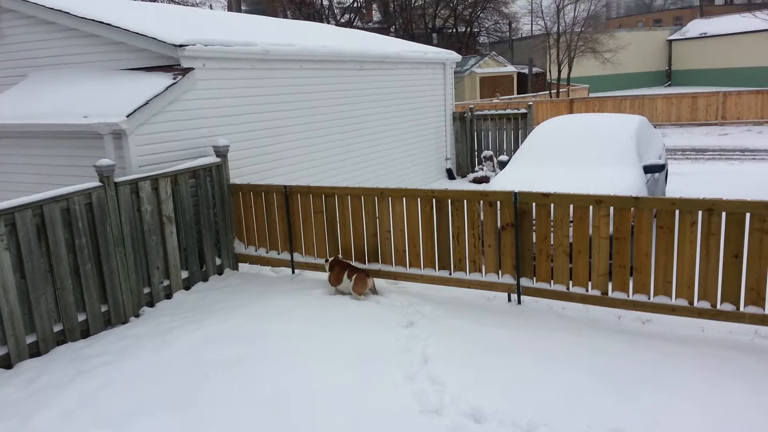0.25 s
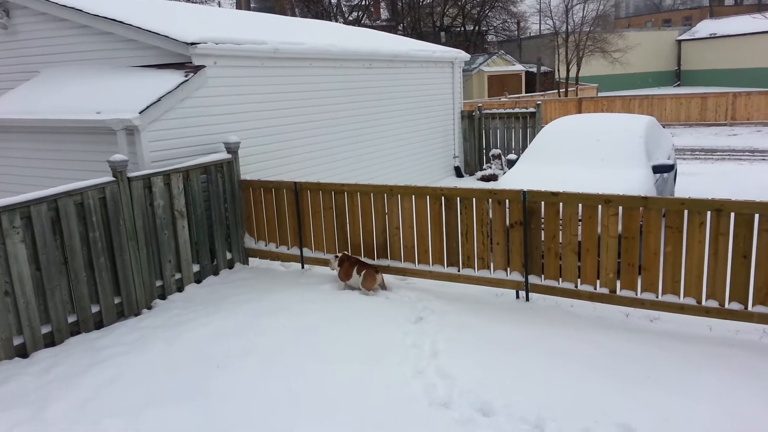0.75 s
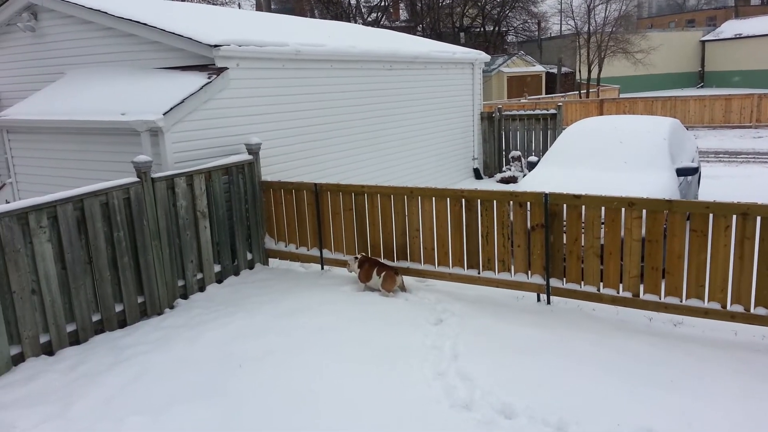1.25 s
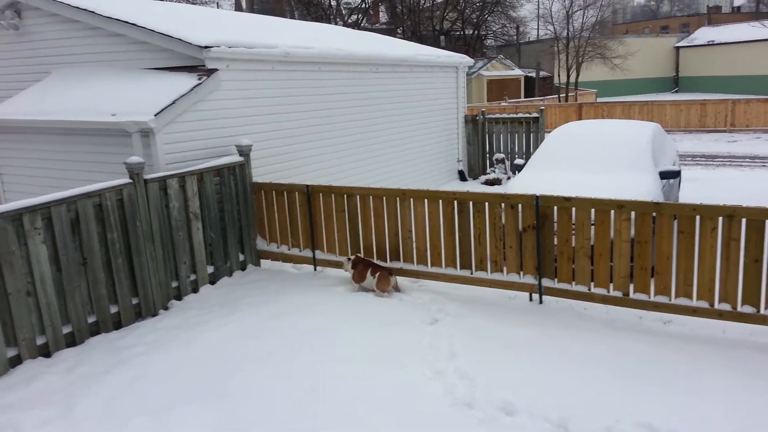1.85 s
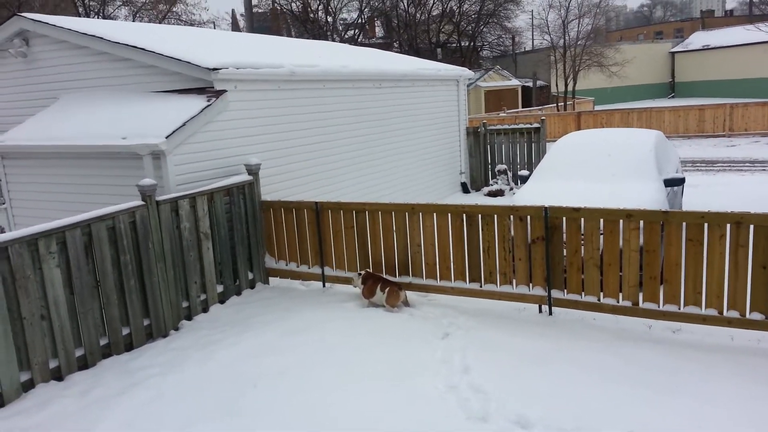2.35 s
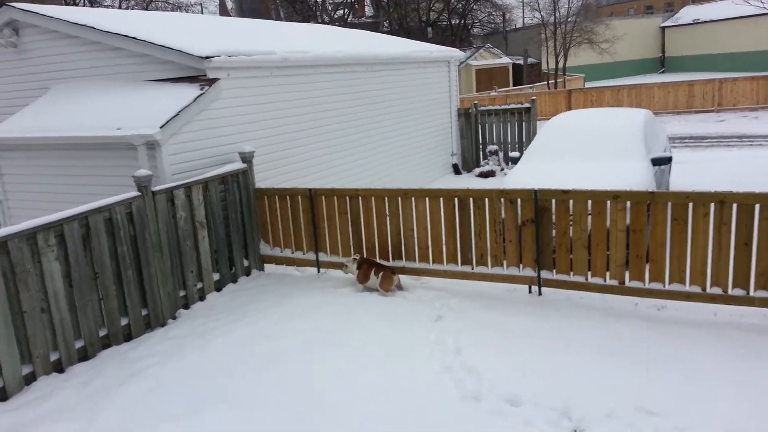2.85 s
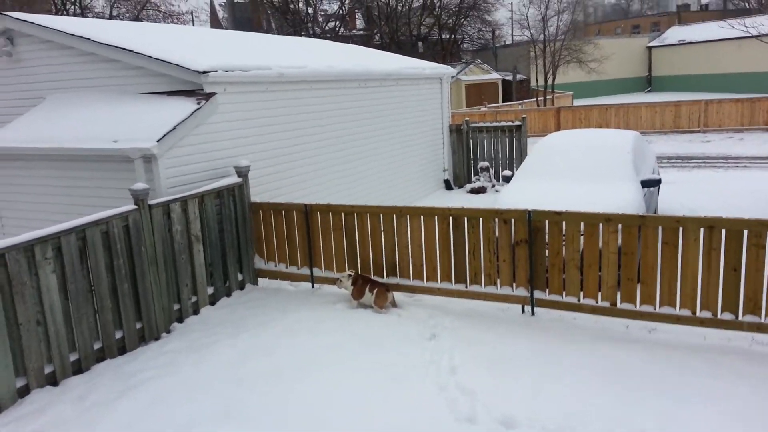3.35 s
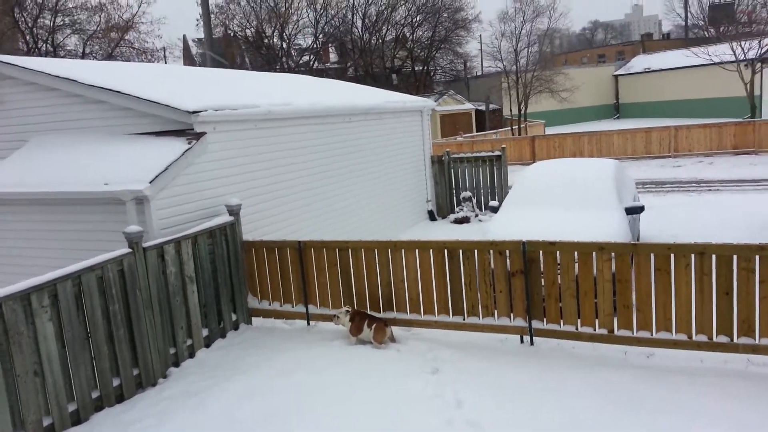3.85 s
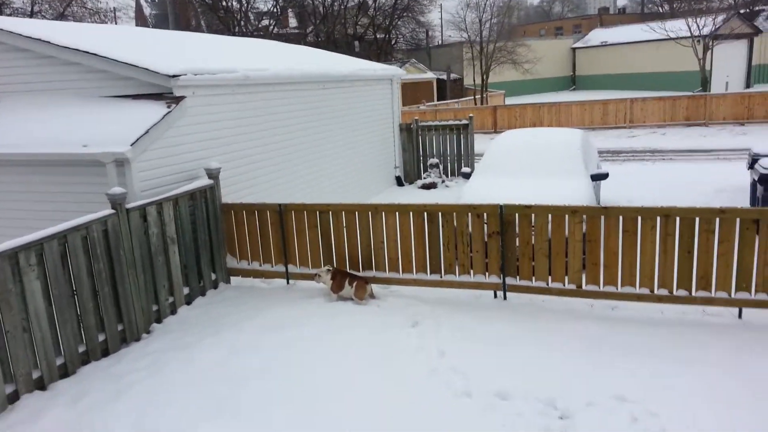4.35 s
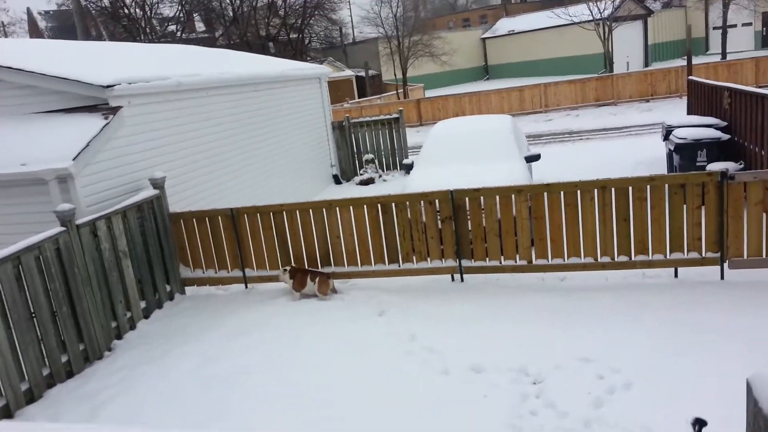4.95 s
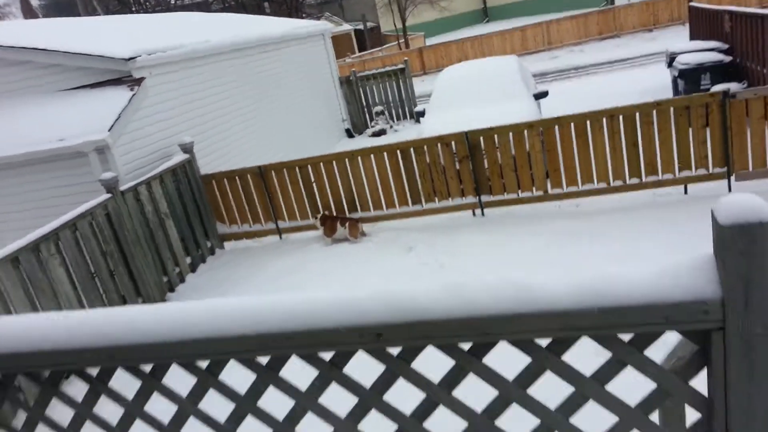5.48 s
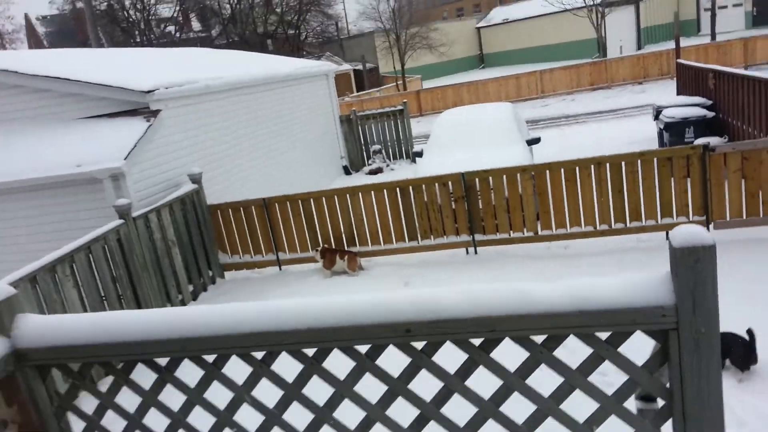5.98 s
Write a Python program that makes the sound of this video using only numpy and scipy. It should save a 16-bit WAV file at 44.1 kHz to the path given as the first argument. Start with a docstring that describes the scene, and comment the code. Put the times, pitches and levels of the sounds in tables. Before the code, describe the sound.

Someone steps slowly across a snow-covered wooden deck just below a hand-held phone. A soft knock and light crunch come first, then frozen boards creak in sharp dry slips near two and three seconds. After four seconds the crust crunches and snaps densely, and the last steps knock dully on the planks. Far traffic hums quietly in an open winter yard.

```python
"""Slow steps across a snow-covered wooden deck, right below a hand-held phone, in a quiet winter yard.
Soles knock the planks dully and pack the snow in random grains that cave in by bursts; crust snaps.
Frozen boards creak in single sharp slips with decaying modes; the joists thud in narrow bands of noise.
Rasps, powder, squeaks and one cloth swish are faint. Behind it filtered noise makes the hum of far traffic."""
import sys
import numpy as np
from scipy import signal
from scipy.fft import rfft, irfft
from scipy.io import wavfile
from scipy.ndimage import uniform_filter1d

SR = 44100
rng = np.random.default_rng(int(sys.argv[2]) if len(sys.argv) > 2 else 0)


def transcribe(u):
    """Save the signal u as a 16-bit wav file named by the first command-line argument.

    u: samples, shape (n,) or (channels, n), limited to [-1, 1]; the rate is SR.
    q: integer samples, one column per channel.
    """
    v = np.clip(np.atleast_2d(u).T, -1, 1)
    q = np.round(v * 32767).astype(np.int16)
    wavfile.write(sys.argv[1], SR, q)


N = 274302
TIME = np.arange(N) / SR

# board resonances: mode_hz, level_db, t60_s
BOARD = [(204, -27, 0.16), (309.2, -6, 0.24), (381.4, -4, 0.24), (483, 9.5, 0.028), (619, -5, 0.12),
         (764, -7, 0.07), (893, 4, 0.04), (1083, -5, 0.061), (1508, 2, 0.053), (1690, -4, 0.085),
         (1817, -6, 0.07), (2107, 0, 0.038), (2284, -5, 0.041), (2520, -17, 0.042), (2980, -0.5, 0.024),
         (3250, -12, 0.065), (3550, -5, 0.015), (3840, -4.5, 0.022)]
# packed snow spectrum: freq_hz, level_db
CRUNCH = [(100, -21), (250, -30), (500, 4.5), (850, 5), (1150, 4), (1500, 3), (2300, -4), (3400, -5.5),
          (4600, -12.5), (7000, -17), (14000, -32)]
# loose powder spectrum: freq_hz, level_db
POWDER = [(1000, -7), (3000, 15.5), (5000, 12.5), (7000, 6), (12000, 8), (15000, -9)]
# snow-softened footfall spectrum: freq_hz, level_db
FOOTFALL = [(30, -45), (60, -33), (100, -17.5), (160, -7), (270, 1.5), (360, -0.5), (500, 2), (680, -14),
            (1400, -20.5), (4000, -67)]


def undb(db):
    """Decibels to gain."""
    return 10 ** (np.asarray(db) / 20)


def unit(x):
    """Scale to rms 1."""
    return x / np.sqrt(np.mean(x ** 2))


def along(points, n):
    """Interpolate a table over log frequency at the bins of an n-point transform."""
    hz, value = np.transpose(points)
    bin_hz = np.arange(n // 2 + 1) * SR / n
    return np.interp(np.log(bin_hz + 1), np.log(hz), value)


def colour(x, points):
    """Filter a sound by a spectrum, zero phase."""
    n = x.shape[-1]
    return irfft(rfft(x) * undb(along(points, n)), n)


def peaked(points, hz, peak_db=7, octaves=0.33):
    """Add one resonance of the given height and width to a spectrum."""
    grid_hz = np.geomspace(60, 15000, 128)
    at_hz, db = np.transpose(points)
    base_db = np.interp(np.log(grid_hz), np.log(at_hz), db)
    bump_db = peak_db * np.exp(-(np.log2(grid_hz / hz) / octaves) ** 2)
    return np.c_[grid_hz, base_db + bump_db]


def click(points, size=1024):
    """Minimum-phase impulse with this spectrum and unit energy."""
    cepstrum = irfft(along(points, size) * np.log(10) / 20)
    # fold onto positive time: causal
    cepstrum[1:size // 2] *= 2
    cepstrum[size // 2 + 1:] = 0
    impulse = irfft(np.exp(rfft(cepstrum)))
    return impulse / np.linalg.norm(impulse)


def band(x, lo_hz, hi_hz, order=2):
    """Butterworth band-pass."""
    edges_hz = [lo_hz, min(hi_hz, SR / 2 - 500)]
    return signal.sosfilt(signal.butter(order, edges_hz, "band", fs=SR, output="sos"), x)


def spread(pair):
    """Mix two unrelated sounds into left and right: alike in the bass, apart in the treble."""
    # channel likeness: freq_hz, likeness_0_to_1
    likeness = [(100, 0.96), (250, 0.92), (500, 0.71), (1000, 0), (3000, 0), (8000, 0)]
    alike = np.clip(along(likeness, pair.shape[1]), 0, 1)
    mid, side = rfft(pair) * np.sqrt([1 + alike, 1 - alike])
    return irfft(np.array([mid + side, mid - side]), pair.shape[1]) / np.sqrt(2)


def pan(left_minus_right_db):
    """Left and right gains."""
    return undb(np.array([[left_minus_right_db], [-left_minus_right_db]]) / 2)


def walk(rate_hz):
    """Random levels held for 1 / rate_hz and smoothed twice; spread near 1."""
    hold = int(SR / rate_hz)
    steps = np.repeat(rng.standard_normal(N // hold + 1), hold)
    return 1.3 * uniform_filter1d(uniform_filter1d(steps, hold), hold)[:N]


def fade(t_s, t60_s):
    """Exponential decay."""
    return np.exp(-np.log(1000) * t_s / t60_s)


def swell(s, length_s):
    """Gaussian rise and fall around time s."""
    return np.exp(-2 * np.minimum(np.abs(TIME - s) / length_s, 10) ** 2)


def burst(points, t60_s, size=8192, rise_s=0.0027):
    """Decaying coloured noise in two channels, unit energy per channel on average."""
    noise = colour(spread(rng.standard_normal((2, size))), points)
    t = TIME[:size]
    return unit(noise * fade(t, t60_s) * (1 - fade(t, rise_s))) / np.sqrt(size)


def grains(points, rate_hz, scatter_db):
    """Ice bonds break at random; positive scatter makes a few large grains, negative a few small."""
    size = undb(scatter_db * np.minimum(rng.exponential(size=(2, N)), 4)) * rng.choice([-1, 1], (2, N))
    breaks = size * (rng.random((2, N)) < rate_hz / SR)
    return unit(signal.fftconvolve(spread(breaks), click(points)[None], axes=1)[:, :N])


def add(out, s, sound):
    """Mix a sound in at time s."""
    i = max(int(s * SR), 0)
    out[:, i:i + sound.shape[1]] += sound[:, :max(N - i, 0)]


def town(level_db=-44.5, drone_hz=224, drone_db=-11, waver_db=1.5):
    """Far traffic: a low roar and a drone that waver together, under a steady smooth hiss."""
    # traffic noise spectrum: freq_hz, level_db
    spectrum = [(25, -48), (50, -17), (140, -2.5), (250, -0.5), (350, -7.5), (450, -9), (880, -17.5),
                (1500, -24.5), (4000, -30), (6800, -36), (10000, -35.5), (13800, -34.5), (15000, -43)]
    # slow level of roar and drone: time_s, level_db
    traffic = [(0, 1), (.6, 1.5), (1.3, 0), (3.5, -1), (4.1, 3.5), (4.6, 5.5), (5.0, 1.5), (6.2, -0.5)]
    noise = unit(colour(spread(rng.standard_normal((2, N))), spectrum))
    roar = colour(noise, [(60, 0), (120, -2.0), (280, 2.5), (600, -13.0), (1500, -14)])
    hiss = noise - roar
    drone = unit(band(rng.standard_normal(N), drone_hz - 9, drone_hz + 9))
    flow = undb(np.interp(TIME, *np.transpose(traffic)) + waver_db * walk(5.45))
    return undb(level_db) * (hiss + flow * (roar + undb(drone_db) * drone))


def swish(middle_s=5.082, length_s=0.075, level_db=-56, middle_hz=5280, glide_hz_per_s=4500, width_hz=330):
    """Cloth slides over cloth: a thin band of hiss, low noise on a rising carrier."""
    hz = middle_hz + glide_hz_per_s * np.clip(TIME - middle_s, -2 * length_s, 2 * length_s)
    carrier = np.sin(2 * np.pi * np.cumsum(hz) / SR)
    hiss = band(rng.standard_normal((2, N)), 15, width_hz) * carrier
    return undb(level_db) * swell(middle_s, length_s) * unit(hiss)


def sags(width_ratio=1.19):
    """Joists take the weight: soft, deep thuds of narrow-band noise."""
    # sagging deck: middle_s, length_s, level_db, pitch_hz
    sag_rows = [(0.124, 0.08, -45.5, 173), (1.78, 0.19, -45, 168), (2.087, 0.035, -46, 211),
                (2.95, 0.13, -44.5, 125), (2.976, 0.053, -42.5, 310), (4.06, 0.11, -42, 166),
                (4.707, 0.059, -43, 61.5), (5.45, 0.15, -52, 68)]
    out = 0
    for s, length_s, db, hz in sag_rows:
        thud = unit(band(rng.standard_normal(N), hz / width_ratio, hz * width_ratio))
        out = out + undb(db) * swell(s, length_s) * thud
    return out


def squeaks(waver_hz=110):
    """Crystals stick and slip fast enough for a brief, unsteady pitch."""
    # squeaking crystals: middle_s, length_s, pitch_hz, level_db
    squeak_rows = [(2.86, .02, 3260, -47), (3.216, .006, 3650, -55), (3.31, .005, 3430, -51)]
    waver = 2 * np.pi * waver_hz * np.cumsum(walk(400)) / SR
    return sum(undb(db) * swell(s, length_s) * np.sin(2 * np.pi * hz * TIME + waver)
               for s, length_s, hz, db in squeak_rows)


def scuffs():
    """A light drag rubs ice crystals in a fine rasp and sweeps loose powder along."""
    # sole skims the crust: middle_s, length_s, rasp_db, powder_db
    scuff_rows = [(1.573, 0.039, -44, -50.5), (2.755, 0.047, -68, -54), (2.844, 0.057, -45.5, -57),
                  (3.954, 0.03, -51.5, -51), (4.01, 0.16, -51, -74), (4.682, 0.037, -45, -49)]
    # rasp spectrum: freq_hz, level_db
    rasp_colour = [(500, -1), (1500, -1), (2700, -5), (3300, 1), (3900, -2), (5200, -12), (6500, -17),
                   (14000, -21)]
    rasp = grains(rasp_colour, rate_hz=11000, scatter_db=-5.0)
    powder = grains(POWDER, rate_hz=6500, scatter_db=-4.0)
    return sum(swell(s, length_s) * (undb(rasp_db) * rasp + undb(powder_db) * powder)
               for s, length_s, rasp_db, powder_db in scuff_rows)


def slip_tilt(hz, bright_db, tick_db):
    """Treble lift in dB of a drier slip: none below 2150 Hz, its own level above 5100 Hz."""
    middle_db = bright_db + np.interp(hz, [750, 5400], [7.5, 4.5])
    return np.where(hz < 2150, 0, np.where(hz > 5100, tick_db, middle_db))


def cracks(slip_db=-3.5, push_db=1, thump_db=2.5, gain_db=23, flex_hz=2200, push_hz=650,
           detune=0.012, mode_scatter_db=3, tick_db=-2.0, tick_share=0.26):
    """A frozen board slips: sharp push and rebound, tearing fibres, brief ring and a boom of the deck."""
    # board slips: start_s, level_db, brightness_db, left_minus_right_db (before an offset),
    # splinter_hz, splinter_db, ring_db, boom_db, boom_hz
    crack_rows = [(0.1642, -46, -2, 0, 3900, 2, -3, 2, 310), (1.6735, -49.5, 7, -1, 3700, 5.5, 0, 2, 230),
                  (1.688, -40.5, -2, 0, 850, -6, -3, 7, 200), (1.698, -36.5, -6, 11, 1800, -6, -2, 1, 170),
                  (1.723, -41.5, -1, -1, 1770, 2, -1, 6, 160), (1.7678, -34, -7, 6, 3320, -6, 0, 0, 170),
                  (1.8311, -41, -9, 9, 1650, 1, 1, 0, 230), (1.856, -33.5, -2, 4, 3230, -10, -4, -0.5, 231),
                  (1.8616, -33, -11, 7, 1690, -2.5, 3, -1.5, 232),
                  (1.947, -39.5, -5, 4, 1650, -2, -4, 5.5, 260),
                  (2.0134, -29, -4, 7, 1650, -8, 1, 0.5, 260),
                  (2.05, -24, -2, 6.5, 2920, -0.5, 2, 1.5, 226), (2.0559, -29, 16, 8, 1900, -1, -2, 2, 280),
                  (2.8786, -37, -3, 8, 1400, -4, -1, 2, 320), (2.9169, -40.5, 0, 13, 2900, -3, -4, 4, 300),
                  (2.9196, -35.5, -13, -2, 2400, -5, -2, 1, 300),
                  (2.9411, -34.5, 4, 11, 2300, 4.5, 4.5, 3, 320), (2.9649, -43, 2, 1, 2400, 8, -2, 4, 300),
                  (2.9759, -48, -1, 11, 2900, 10, 3, 3, 300), (2.9794, -36, 20, 8.5, 3820, 3.5, 0, 1, 310),
                  (3.012, -43.5, 6, 7, 3000, 9, 0, 8, 300), (3.046, -45.5, 3, 12, 3400, 7, 4, 5, 300),
                  (3.06, -38, 22, 7.5, 4240, 5, -1, 3.5, 320),
                  (4.8628, -29.5, -17, 14.5, 1170, -8, 1, -2, 480),
                  (4.879, -41, -12, -3, 1900, -9, -2, 3, 400)]
    # slip spectrum: freq_hz, level_db
    slip_hz, slip_colour_db = np.transpose([(60, -48), (150, -28), (350, 10), (800, -9.5), (1400, -3),
                                            (2600, -17), (3400, -6), (4300, -20.5), (6000, -19),
                                            (8500, -18), (14000, -25)])
    # torn fibre spectrum: freq_hz, level_db
    fibres = [(150, -22), (400, -12), (900, -0.5), (2400, 0.5), (3600, 0.5), (4300, -11.5), (5200, -6),
              (5900, -22), (7500, -17.5), (14000, -44)]
    # boom spectrum: freq_hz, level_db
    rumble = [(30, -46), (60, -14), (100, -10), (170, -1.5), (300, -2), (480, -3), (700, -22), (1400, -22),
              (4000, -62)]
    out, t = np.zeros((2, N)), TIME[:8192]
    hz, mode_db, t60_s = np.transpose(BOARD)[:, :, None]
    g = np.tan(np.pi * flex_hz / SR)
    lag = (g - 1) / (g + 1)
    swing = 2 * np.pi * push_hz * (t - .0006)
    push = unit(swing * np.exp(-swing ** 2 / 2)) / np.sqrt(len(t))
    for s, db, bright_db, pan_db, splinter_hz, torn_db, ring_db, boom_db, boom_hz in crack_rows:
        top_db = tick_db + tick_share * bright_db
        slip = click(np.c_[slip_hz, slip_colour_db + slip_tilt(slip_hz, bright_db, top_db)], size=8192)
        # all-pass dispersion: bending waves carry the treble ahead of the bass
        for _ in range(4):
            slip = signal.lfilter([lag, 1], [1, lag], slip)

        pitch_hz = hz * (1 + detune * rng.standard_normal(hz.shape))
        scatter_db = mode_scatter_db * rng.standard_normal((len(hz), 1))
        reach = undb(mode_db + slip_tilt(hz, bright_db, top_db) / 2 + scatter_db)
        # channel phases differ more in the treble
        phase = rng.uniform(0, 2 * np.pi, hz.shape) + rng.standard_normal((2, len(hz), 1)) * hz / 3500
        modes = reach * fade(t, t60_s) * np.sin(2 * np.pi * pitch_hz * t + phase)
        ring = unit(modes.sum(1) * (1 - fade(t, 0.0097))) / np.sqrt(len(t))

        splinters = burst(peaked(fibres, splinter_hz), t60_s=0.014, rise_s=0.0022)
        # more tearing leaves less clean click
        clean = 1 / np.hypot(1, undb(torn_db - 11.0))
        bright = undb(slip_db) * clean * band(slip, 110, 8700, order=1)
        bright = bright + undb(ring_db) * ring + undb(torn_db) * splinters
        boom = burst(peaked(rumble, boom_hz, peak_db=5.5, octaves=.35), t60_s=0.12)
        low = undb(push_db) * push + undb(thump_db + boom_db) * boom
        add(out, s - .0003, undb(db + gain_db) * (bright * pan(pan_db - 8.0) + low))
    return out


def snaps(gain_db=13, tick_db=-6, thud_db=-5, thud_t60_s=0.057, deck_hz=360):
    """Crust breaks with a dry tick and crumbles; each piece has its own pitch, the plank below thuds."""
    # crust pieces: start_s, level_db, left_minus_right_db (before an offset), pitch_hz, crumble_t60_s
    snap_rows = [(0.028, -40.5, 0, 2800, 0.028), (3.215, -44, 0, 2200, .018), (3.231, -36, 0, 950, .035),
                 (3.378, -35.5, -2, 1600, 0.025), (3.9348, -45, 2, 3000, .02), (3.964, -29, 0, 800, 0.033),
                 (3.9992, -29, 8, 2600, 0.018), (4.0128, -32, -2, 4000, 0.011),
                 (4.0209, -25.5, 9, 1660, 0.038), (4.029, -29, 4, 2300, .02),
                 (4.0455, -31, -4, 3800, 0.015), (4.054, -32, 2, 1600, 0.022), (4.0662, -31, 1, 4400, .018),
                 (4.116, -29, -1, 2000, 0.027), (4.158, -41, 3, 2600, .02), (4.1992, -33, 5, 1480, 0.029),
                 (4.231, -35.5, -1, 1700, .04), (4.263, -35, 6, 2420, .04), (4.355, -34, 6, 1500, .03),
                 (4.4122, -27.5, 13, 1300, 0.0072), (4.424, -37, 7, 3200, .015),
                 (4.469, -34, 6, 1500, 0.028), (4.508, -35.5, 11, 3200, 0.027), (4.529, -37, 8, 3300, .018),
                 (4.544, -26, -1, 1880, 0.049), (4.599, -32.5, 3, 1680, 0.03),
                 (4.633, -31.5, 6, 3220, 0.037), (4.66, -27.5, 7, 3200, 0.029),
                 (4.7063, -25, 3, 1600, 0.026), (4.7504, -34, 3, 2400, .025), (4.799, -29, 6, 1190, 0.028),
                 (4.839, -39, 3, 1490, .025), (4.865, -18, -0.5, 1170, 0.07), (4.9461, -25, 4, 1160, 0.041),
                 (5.093, -41, 1, 2000, .012), (5.212, -38, 5, 1500, .03), (5.247, -33, 7, 1150, 0.091),
                 (5.278, -31.5, 6, 940, 0.057), (5.33, -32, 3, 1300, .03), (5.3624, -25.5, 4, 880, 0.036),
                 (5.3752, -34, -2, 2200, .008), (5.3972, -21, 3, 1700, 0.052),
                 (5.4215, -24.5, 1, 2200, 0.048), (5.452, -31, -3, 1610, .03), (5.463, -30, 2, 3000, .02),
                 (5.4699, -21, 8, 1680, 0.04), (5.476, -22.5, 6, 740, .05), (5.486, -26, -4, 2190, 0.054),
                 (5.497, -26, 8, 1400, 0.14), (5.541, -32, 2, 1400, 0.044), (5.563, -30, 4, 1405, 0.057),
                 (6.067, -31, 6, 2200, 0.046), (6.138, -29, 14, 1600, .045), (6.156, -25, 0, 1500, .035),
                 (6.177, -34, 3, 3200, .025)]
    # broken crust spectrum: freq_hz, level_db
    crust = [(200, -6), (600, 13), (1500, 8.5), (2400, 1.5), (3500, 0.5), (4800, -8), (7000, -21),
             (14000, -21)]
    out = np.zeros((2, N))
    for s, db, pan_db, hz, t60_s in snap_rows:
        piece = peaked(crust, hz)
        snap = undb(tick_db) * click(piece, size=8192) + burst(piece, t60_s, rise_s=0.0036)
        thud = undb(thud_db) * burst(peaked(FOOTFALL, deck_hz, peak_db=4, octaves=.45), thud_t60_s)
        add(out, s + 0.00028, undb(db + gain_db) * (snap * pan(pan_db - 3.5) + thud))
    return out


def collapses(rate_hz=75, t60_s=.025):
    """Pockets of snow cave in at random; each sets off a short decaying avalanche."""
    starts = (rng.random(N) < rate_hz / SR) * rng.uniform(.3, 1, N)
    t = TIME[:4096]
    return unit(signal.fftconvolve(starts, fade(t, t60_s) * (1 - fade(t, 0.0031)))[:N])


def bearing(s, rise_s, hold_s, onset_db=15.5, release_db_per_s=87):
    """Weight of one press: climbs onset_db in rise_s, holds, then dies away."""
    early_s, late_s = np.maximum(s - TIME, 0), np.maximum(TIME - s - hold_s, 0)
    return undb(-onset_db * early_s / rise_s - release_db_per_s * late_s)


def snow(crunch_db=-2, rumble_db=-6.0, powder_db=-2, wood_db=-11, merging=0.99):
    """Snow packs in fits and starts under the sole; the deck rumbles with it and loose powder hisses."""
    # sole bears down: full_weight_s, rise_s, hold_s, crunch_db, rumble_db, powder_db
    presses = [(0.098, 0.11, 0.1, -63, -41, -69), (1.42, 0.26, 0.31, -56, -50, -59.5),
               (1.67, .06, 0.27, -63, -43.5, -56.5), (2.045, 0.043, 0.025, -44.5, -39.5, -50),
               (2.859, 0.026, 0.15, -47, -37, -54.5), (3.21, 0.033, 0.18, -58.5, -70, -63),
               (4.021, 0.12, 0.048, -42.5, -35, -48.5), (4.184, 0.18, 0.39, -50, -55, -55.5),
               (4.67, 0.019, 0.05, -42.5, -35, -48), (4.86, 0.099, 0.042, -41.5, -40, -56),
               (5.038, 0.14, 0.032, -49, -67, -51.5), (5.412, 0.088, 0.055, -36, -32.5, -49),
               (5.547, .14, 0.043, -50, -56, -54.5), (5.91, 0.24, 0.25, -52, -49.5, -55.5),
               (6.135, 0.074, 0.021, -41.5, -33, -47)]
    weights = np.array([bearing(*row[:3]) for row in presses])
    # presses add in power
    press, load, brush = np.sqrt(undb(np.array(presses)[:, 3:].T) ** 2 @ weights ** 2)
    # heavy pressure merges single collapses into one dense crush
    crush = merging * (1 + press / undb(-35.0))
    stutter = (crush + collapses(rate_hz=130, t60_s=0.038)) / (crush + 1)
    crunch = stutter * grains(CRUNCH, rate_hz=1500, scatter_db=1.5)
    # board resonances, damped by the boot
    wood = sum(undb(db) * signal.lfilter(*signal.iirpeak(hz, hz * t60_s / 5, SR), crunch)
               for hz, db, t60_s in BOARD)
    crunch = undb(crunch_db) * unit(unit(crunch) + undb(wood_db) * unit(wood))
    rumble = undb(rumble_db) * unit(stutter * grains(FOOTFALL, rate_hz=2000, scatter_db=2.5))
    powder = undb(powder_db) * grains(POWDER, rate_hz=7000, scatter_db=3.5)
    return press * crunch + load * rumble + brush * powder


def knocks(gain_db=18, grit_db=1, boom_db=-4, knock_t60_s=0.046, lead_s=0.000076, hardness=0.73,
           rebound_s=0.013, rebound_db=-8):
    """The sole drops through the snow: damped plank knock, frost tick, grit spray, low boom and rebound."""
    # sole meets deck: start_s, level_db, grittiness_db (halved for the grit level), pitch_hz, frost_db, boom_db
    knock_rows = [(0.1646, -25.5, -33, 305, -32, -2), (4.598, -30, -11, 475, -13, 2.5),
                  (4.8598, -27.5, -20, 540, -16, -14), (5.152, -37.5, 0.5, 317, -11, 0),
                  (5.275, -28, -19, 516, -21, -3), (5.285, -26.5, -37, 630, -30, -1),
                  (5.3621, -24, -40, 470, -21, 0), (5.371, -27, -34, 300, -25, 0),
                  (5.421, -23.5, -19, 537, -22, 5.5), (5.434, -21.5, -38, 279, -35, -7),
                  (5.747, -32, -7, 457, -16, -2), (5.845, -32.5, -8, 314, -13, -3),
                  (5.9022, -26, -16, 397, -12, 5), (6.007, -23, -31, 450, -16.5, 0.5),
                  (6.069, -27, -16, 434, -18, -1), (6.109, -23.5, -20, 365, -18, -5),
                  (6.137, -23.5, -6, 303, -14, -2), (6.155, -24.5, -21, 390, -21, -6)]
    # plank overtones: pitch_multiple, level_db
    plank = [(1, 8), (1.68, -1.5), (2.1, -9), (2.7, -12)]
    # shattering frost spectrum: freq_hz, level_db
    frost_colour = [(1500, -19), (4000, 7.5), (7000, -0.5), (13000, 6), (15000, -7)]
    out, t = np.zeros((2, N)), TIME[:8192]
    # left channel leads
    late_s = np.maximum(t - np.array([[0], [lead_s]]), 0)
    for s, db, gritty_db, hz, frost_db, deck_db in knock_rows:
        # gritty snow is a harder contact and wakes the overtones
        tones = sum(undb(tone_db + hardness * (gritty_db + 10) * (k - 1)) * np.sin(2 * np.pi * k * hz * late_s)
                    for k, tone_db in plank)
        onset = 1 - np.exp(-late_s * hz / 0.57)
        knock = unit(tones * fade(late_s, knock_t60_s) * onset) / np.sqrt(len(t))
        spray = burst(CRUNCH, t60_s=0.075, rise_s=0.0073)
        spray = spray + undb(-15.0) * burst(POWDER, t60_s=0.077, rise_s=0.0032)
        grit = undb(grit_db + .5 * gritty_db) * spray
        frost = undb(frost_db - 0.5) * burst(frost_colour, t60_s=.03, rise_s=0.0062)
        boom = undb(boom_db + deck_db) * burst(FOOTFALL, t60_s=0.25)
        add(out, s + 0.00096, undb(db + gain_db) * (knock + grit + frost + boom))
        rebound = burst(peaked(FOOTFALL, hz, peak_db=-1, octaves=0.32), t60_s=0.11)
        add(out, s + rebound_s, undb(db + gain_db + rebound_db) * rebound)
    return out


def scene(yard_db=-17):
    """The steps, their faint return from house wall and fences, and the town."""
    # steps lie below and to the left of the phone: freq_hz, left_minus_right_db
    shadow = [(700, -0.5), (1300, 2), (2200, 7), (3000, 5.5), (4000, -0.5), (7000, -2.5), (14000, 12)]
    left, right = swish() + sags() + squeaks() + scuffs() + cracks() + snaps() + snow() + knocks()
    left = colour(left, [(hz, db / 2) for hz, db in shadow])
    right = colour(right, [(hz, -db / 2) for hz, db in shadow])
    steps = np.array([left, right])
    yard_colour = [(150, 6.0), (600, -3), (3000, -8.0), (10000, -19.0)]
    yard = burst(yard_colour, t60_s=0.34, size=16384, rise_s=0.022)
    echo = undb(yard_db) * signal.fftconvolve(steps, yard, axes=1)[:, :N]
    return band(steps + echo, 89, 13700) + town()


def record(dry, top_hz=14650):
    """The phone cuts the top steeply: elliptic low-pass."""
    return signal.sosfilt(signal.ellip(10, .2, 70, top_hz, fs=SR, output="sos"), dry)


dry = scene()
out = record(dry)
transcribe(out)
```